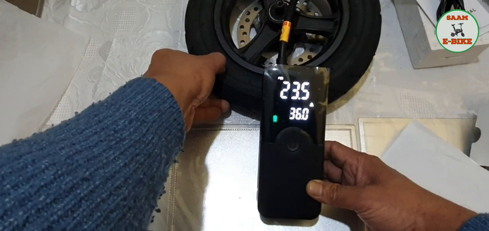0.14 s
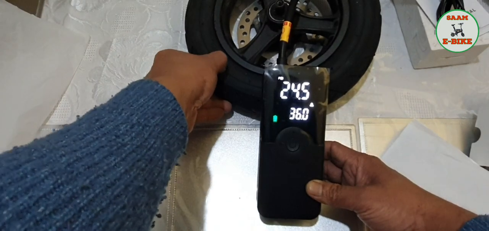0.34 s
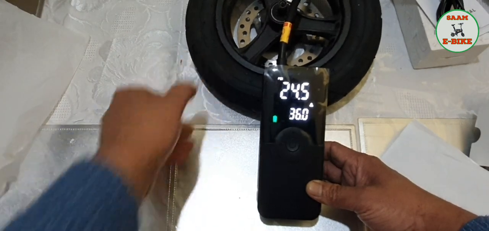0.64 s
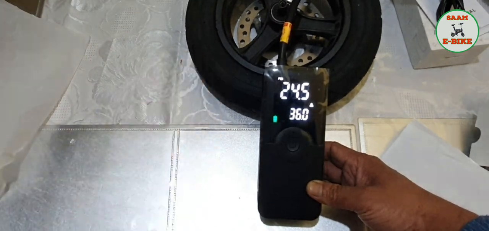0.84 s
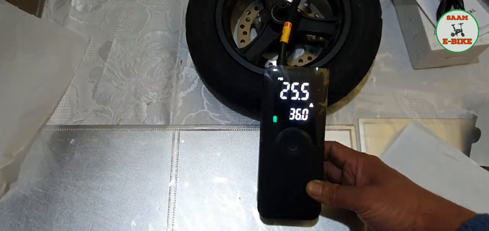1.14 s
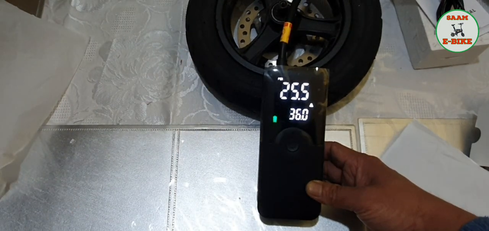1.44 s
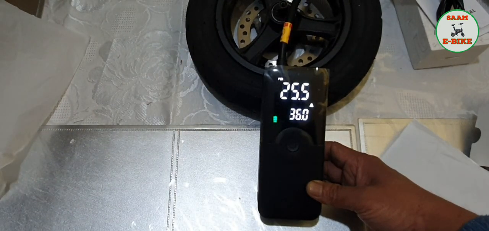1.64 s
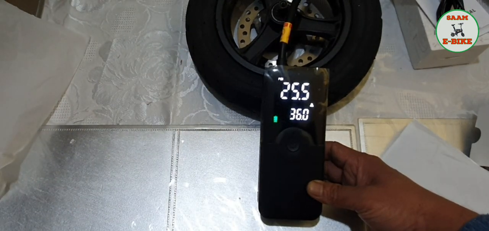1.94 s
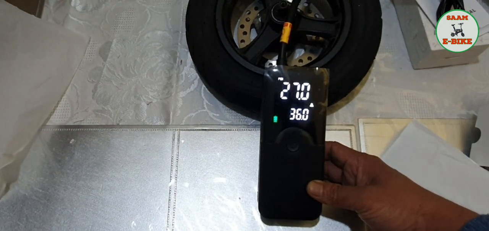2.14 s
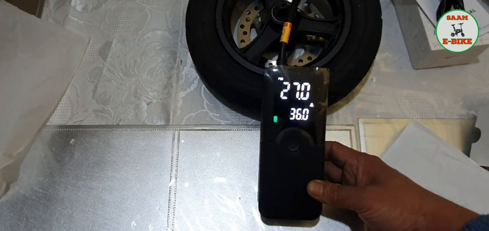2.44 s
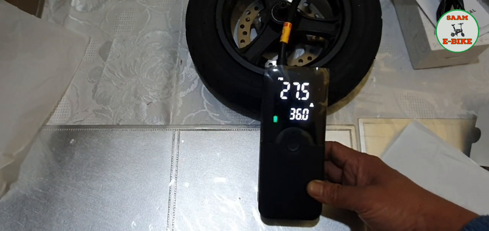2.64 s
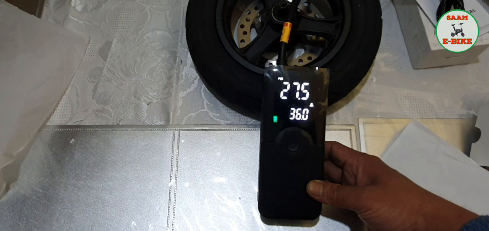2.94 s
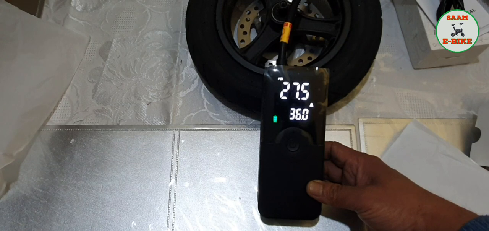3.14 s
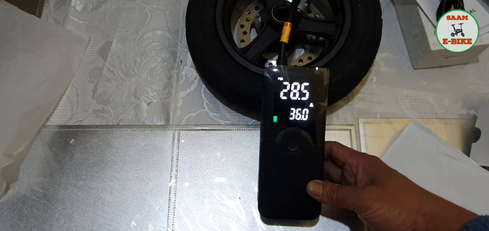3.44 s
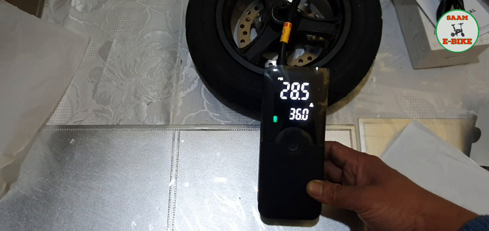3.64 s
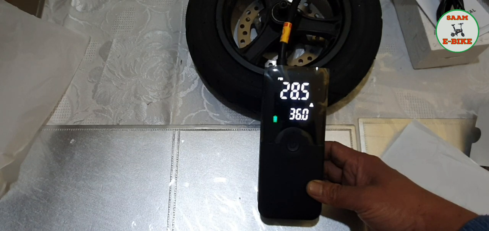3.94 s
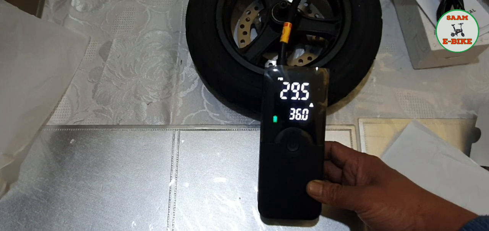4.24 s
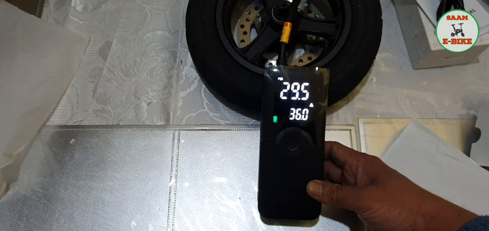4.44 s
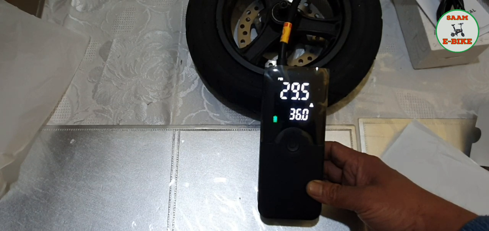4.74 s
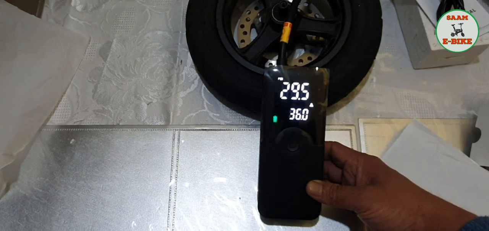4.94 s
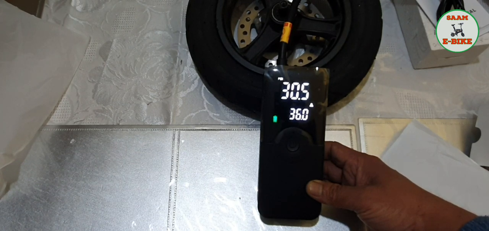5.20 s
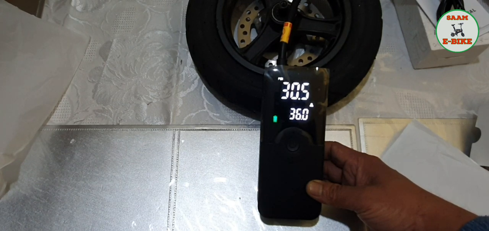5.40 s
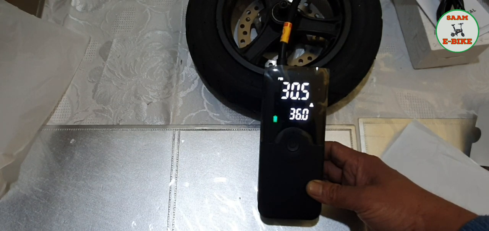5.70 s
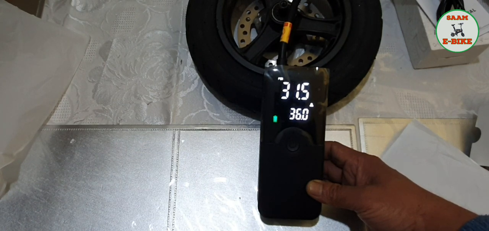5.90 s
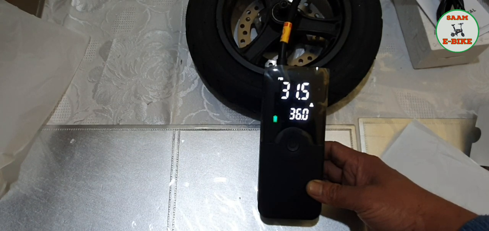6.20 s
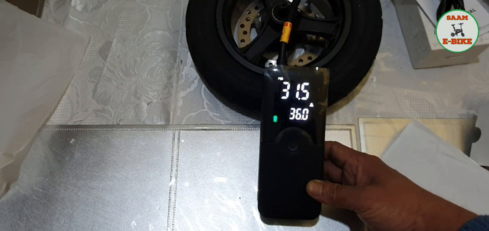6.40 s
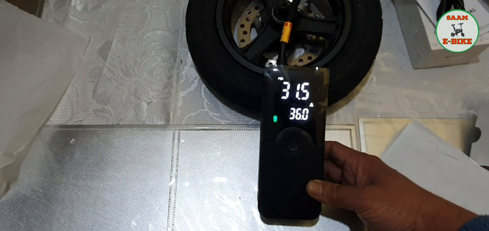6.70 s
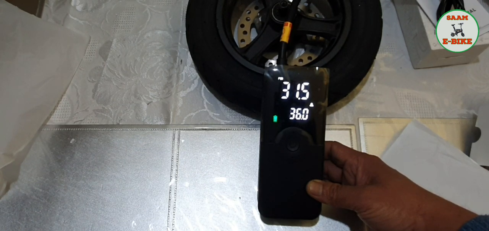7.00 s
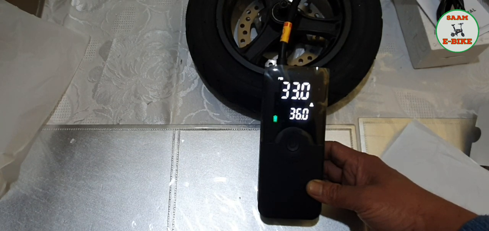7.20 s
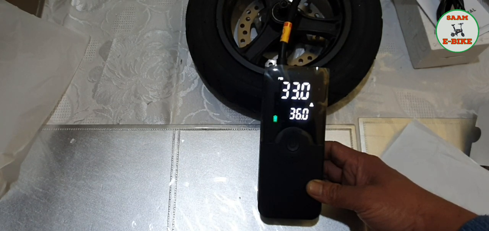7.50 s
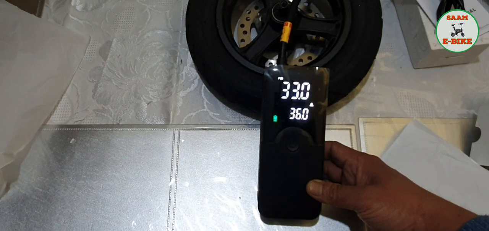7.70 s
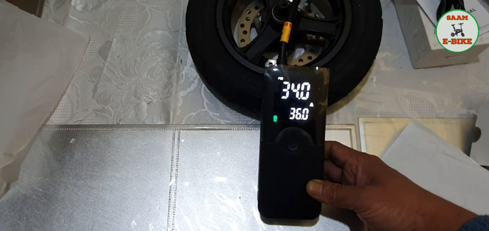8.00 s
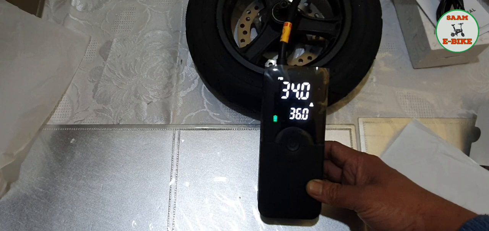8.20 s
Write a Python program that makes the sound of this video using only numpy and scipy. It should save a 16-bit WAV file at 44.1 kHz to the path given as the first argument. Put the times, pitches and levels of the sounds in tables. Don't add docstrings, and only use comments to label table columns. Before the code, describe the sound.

From 0 s a small battery piston compressor is already at full speed, close to the microphone over a tiled floor, and it never stops. About 54 strokes a second merge into a rough, low buzzing drone with strong midrange harmonics, dense metallic gear chatter around 1 to 3 kHz and a fluttering valve hiss above. Until about 0.5 s a hand presses nearby, adding a little low shake and slightly shading the treble; it lets go and withdraws by 1.5 s, so the timbre opens subtly. Between about 2 and 5 s the tire firms up: the pulse becomes harder and its harmonic color changes, while pitch sags gently toward 52 strokes a second, with tiny wavering. From 5 s to the end at 8.35 s the same dry, loud rattle holds steady, with short hard reflections and fairly wide treble, cutting off still running.

```python
import sys
import numpy as np
from scipy import signal
from scipy.fft import rfft, irfft, next_fast_len
from scipy.io import wavfile
from scipy.ndimage import map_coordinates

SR = 44100
rng = np.random.default_rng(int(sys.argv[2]) if len(sys.argv) > 2 else 0)


def int16_out(signal):
    q = np.round(np.clip(np.atleast_2d(signal).T, -1, 1) * 32767)
    wavfile.write(sys.argv[1], SR, q.astype(np.int16))


def volts(x):
    e = np.asarray(x, float) / 20
    return 10 ** e


N = 368232

# time_s, speed_hz [turns per second]
CRANK = [(0, 54.08), (.76, 54.09), (1.52, 53.8), (2.28, 53.51), (3.04, 53.36), (3.8, 52.82), (4.55, 52.72),
         (5.31, 52.33), (6.07, 52.8), (6.83, 52.64), (7.59, 52.26), (8.35, 52.31)]
# time_s, nearness [0-1], lean_db [left over right]
HAND = [
    (0, 0.87, 0),
    (.42, .9, -1),
    (.56, 0.67, -1),
    (.9, 0.33, 0),
    (1.2, 0.46, 0.2),
    (1.5, 0.23, 0.2),
    (4, 0.01, 0.06),
    (8.35, 0.21, -0.05),
]


def unit(x):
    return x / np.sqrt(np.mean(x ** 2) + 1e-20)


def along(points, hz):
    f, v = np.transpose(points)
    return np.interp(np.log(hz + 1), np.log(f + 1), v)


def curves(rows):
    time_s, *columns = np.transpose(rows)
    return [np.interp(np.arange(N) / SR, time_s, column) for column in columns]


def wobble(rate):
    knots = rng.standard_normal(int(N * rate / SR) + 4)
    return map_coordinates(knots, [np.arange(N) * rate / SR])


def s_curve(at_s, over_s):
    return 1 / (1 + np.exp((at_s - np.arange(N) / SR) / over_s))


def filtered(x, response):
    m = next_fast_len(N + SR // 4)
    return irfft(rfft(x, m) * response(np.fft.rfftfreq(m, 1 / SR)), m)[..., :N]


def bell(hz, centre_hz, width_hz):
    return 1 / (1 + (2 * (hz - centre_hz) / width_hz) ** 2)


def air_pulse(angle, hard, thump_db):
    # soft_tyre_db, hard_tyre_db, held_tyre_db
    air_orders = [(-17.5, -23, -20), (-16.5, -13, -14.5), (-14.5, -13, -11), (-11, -10.5, -10.5),
                  (-18, -6.5, -40), (-10, -11.5, -9), (-16, -6, -9.5), (-12, -12, -16.5),
                  (-13.5, -5.5, -8.5), (-39, -35, -5), (-24, -7, -26), (-4.5, -19, -18), (-11, -18, -46),
                  (-13, -19, -27), (-17, -11.5, -13), (-19, -11.5, -18), (-2.5, -17, -5.5), (0, -16, -5),
                  (-2.5, -7, -3), (0.5, -19, -17.5), (-35, -39, -13), (-12, -23, -28), (-22, -8, -11)]
    # centre_hz, width_hz, lift_db
    rim = [
        (800, 14, 9),
        (1011.5, 27.6, 7),
    ]
    # crank_multiple, level_db
    motor = [
        (12.68, -45.5),
        (13.62, -59),
    ]
    hand, speed_hz = curves(HAND)[0], curves(CRANK)[0]

    pressing = 1 - s_curve(at_s=0.53, over_s=.03)
    shake_db = -49.5 - 3 * hard + 12.5 * pressing
    x = volts(shake_db) * np.cos(2 * np.pi * angle - .7 + .08 * wobble(60))
    x += volts(thump_db + 0.4 * wobble(4.6)) * np.cos(4 * np.pi * angle + 0.036 * wobble(60))

    for k, (soft_db, hard_db, held_db) in enumerate(air_orders, 3):
        unsteady = .011 * k
        free_db = soft_db + (hard_db - soft_db) * hard
        db = -35.5 + free_db + (held_db - free_db) * hand + 4 * unsteady * wobble(4.18)
        db += sum(lift_db * bell(k * speed_hz, hz, width) for hz, width, lift_db in rim)
        thud = 2 * np.pi * k * (angle - .84) - 2.6
        thud += .36 * (-1) ** k + .045 * k * np.sin(k * k / 5)
        smear = 1.17 * hard * (k > 11) * np.sin(k * k)
        x += volts(db) * np.cos(thud + smear + unsteady * wobble(16))

    for k, db in motor:
        x += volts(db + 1.1 * wobble(3.5) - 4.7 * hand) * np.cos(2 * np.pi * k * angle)
    return np.sqrt(2) * x


def knocks(angle, hard):
    # pitch_hz, length_s, soft_tyre_db, hard_tyre_db, hand_change_db, scatter_turns
    bursts = [(2230, 0.0026, -43, -38, -1, 0.000453), (2760, 0.0011, -36, -44, -5, 0.00054),
              (2334, 0.0023, -23, -25, 1, 0.0004), (2187, 0.0018, -47, -29, -40, 0.00012),
              (5040, 0.0023, -33.5, -47, 1, 0.0014), (1979, 0.0018, -22, -24, -14.5, 0.00011),
              (1930, 0.002, -32, -22, 6, 0.00043), (1622, 0.0017, -34, -46, 2.5, 0.00054),
              (1443, 0.0022, -32.5, -25.5, -10.5, .0003), (3473, 0.0011, -40.5, -36, 6.5, 0.0014),
              (2765, 0.00091, -33.5, -32.5, -8, 0.00086)]
    knock_angles = [.07, .4, .58, .61, .67, .72, .74, .77, .74, .87, .88]
    x, t = np.zeros(N), np.arange(-SR // 100, SR // 100 + 1) / SR
    hand = curves(HAND)[0]
    stroke = rng.standard_normal((500, 2))
    for at, (hz, length, soft_db, hard_db, hand_db, scatter) in zip(knock_angles, bursts):
        chance = rng.standard_normal((500, 2))
        late = .0009 * stroke[:, 0] + scatter * chance[:, 0]
        spot = np.interp(np.arange(len(chance)) + at + late, angle, np.arange(N), right=N + 5)
        whole, part = spot.astype(int), spot % 1
        size = volts(.3 * stroke[:, 1] + .5 * chance[:, 1])
        blows = np.bincount(whole, size * (1 - part), N + 9)
        blows = blows + np.bincount(whole + 1, size * part, N + 9)
        falling = np.sin(2 * np.pi * hz * t * (1 - 4 * t))
        burst = np.exp(-.5 * (t / length) ** 2) * falling
        db = soft_db + (hard_db - soft_db) * hard + hand_db * hand
        x += volts(db) * unit(signal.fftconvolve(blows[:N], burst, "same"))
    return x


def load(angle, centre, sharp, skew):
    u = 2 * np.pi * (angle - centre)
    return np.exp(sharp * (np.cos(u + skew * np.cos(u) - skew) - 1))


def rattle(angle, hard, db):
    # frequency_hz, density_db [per Hz]
    colour = [(40, -30), (150, -23), (330, -19), (520, -15.5), (800, -7.5), (1100, -5), (1600, -3.5),
              (2000, -3.5), (2400, -2), (3300, -5.5), (5000, -12.5), (6400, -9.5), (7500, -19),
              (12000, -61)]
    pinion = np.cos(2 * np.pi * angle / 5)
    ticks = np.cos(2 * np.pi * (9 * angle - .85))
    teeth = volts(2.2 * ticks + .8 * pinion + 0.63 * wobble(900))
    stroke = load(angle, .73, sharp=1.7, skew=.2)
    clatter = casing_noise(stroke * teeth, colour, lift_db=6)
    bright = filtered(clatter, lambda hz: 1 / (1 + (2900 / (hz + 1)) ** 8))
    chatter = casing_noise(volts(0.22 * wobble(700)), colour, lift_db=6)
    loose = filtered(chatter, lambda hz: 1 / (1 + (hz / 1350) ** 8))
    return volts(db + 3.5) * (chatter - 0.14 * hard * loose) + volts(db + 3.0) * bright


def hiss(angle, db):
    # frequency_hz, density_db [per Hz]
    colour = [(3000, -26), (5500, 0), (6800, -7.5), (8900, -4.5), (10000, -3), (11400, -5.5), (12400, -0.5),
              (13800, -4.5), (15000, -6), (15800, -7.5)]
    flutter = np.cos(2 * np.pi * (7 * angle + 0.29))
    bursts = volts(.7 * flutter + 0.18 * wobble(30) + 0.64 * wobble(1200))
    gate = (0.5 + load(angle, 0.55, sharp=1.34, skew=0.55)) * bursts
    air = casing_noise(gate, colour, lift_db=3)
    shaded = filtered(air, lambda hz: 1 / (1 + ((hz - 9900) / 1100) ** 4))
    return volts(db + 2.3) * (air - 0.29 * curves(HAND)[0] * shaded)


def casing_noise(gate, spectrum, lift_db):
    hissing = gate * rng.standard_normal((2, N))
    return unit(filtered(hissing, lambda hz: volts(along(spectrum, hz)) * shell(hz, lift_db)))


def shell(hz, lift_db):
    # centre_hz, width_hz, level_db [unused]
    modes = [(2317, 110, 0), (2160, 1450, 0), (2800, 270, 0), (3626, 300, -3), (3960, 105, -6),
             (4350, 27, -7), (4555, 310, -6), (5250, 110, -5), (5670, 230, -7), (7700, 210, -12),
             (8500, 310, -11), (9560, 210, -10), (10350, 230, -11), (11100, 180, -13), (12350, 200, -9),
             (13500, 200, -10), (14130, 150, -12)]
    # centre_hz, width_hz, depth_db
    notches = [(2520, 82, 1.5), (3310, 90, 5), (4270, 48, -4.5), (4440, 80, 6.5), (5430, 190, 7.5),
               (6090, 130, 5.5), (6680, 170, 8.5), (8260, 130, -0.5), (8800, 200, 2), (10250, 83, 1),
               (11800, 200, 0.5), (12820, 120, 0), (13800, 150, 3)]
    lift = np.max([bell(hz, c, w) for c, w, _ in modes], axis=0)
    cut_db = sum(db * bell(hz, c, w) for c, w, db in notches)
    return volts(lift_db * lift - cut_db)


def echoes(hz, column):
    # delay_s, mid_gain, side_gain
    walls = [(.0006, 0.4, -0.28), (.0014, -0.5, 0.17), (.0027, 0.32, 0.94), (.0043, 0.4, -0.019),
             (.0071, 0.4, 0.6), (0.015, 0.1, 0.1)]
    rows = np.array(walls)
    gains = rows[:, column]
    return np.exp(-2j * np.pi * np.outer(hz, rows[:, 0])) @ gains / np.linalg.norm(gains)


def scene():
    # frequency_hz, side_over_mid_db
    width = [(60, -29), (110, -17), (200, -13), (380, -27), (700, -4), (1290, -5), (2380, -7), (4400, 0),
             (8120, -3.5), (15000, 1)]
    hard = 0.9 * s_curve(at_s=3.66, over_s=0.89)
    angle = np.cumsum(curves(CRANK)[0]) / SR + .143
    angle = angle + .006 * wobble(5) + .003 * wobble(13)
    noise, scattered = rattle(angle, hard, db=-26.5) + hiss(angle, db=-30)
    source = noise + air_pulse(angle, hard, thump_db=-35.5) + knocks(angle, hard)
    mid = filtered(source, lambda hz: 1 + 0.28 * echoes(hz, 1) * hz / (hz + 4000))
    side = filtered(source, lambda hz: .8 * echoes(hz, 2)) + .88 * scattered
    side = filtered(side, lambda hz: volts(along(width, hz)))
    return np.array([mid + side, mid - side]) * volts(np.outer([.5, -.5], curves(HAND)[1]))


def roll_off(x):
    return signal.sosfilt(signal.butter(12, 16470, fs=SR, output="sos"), x)


def record(dry):
    # frequency_hz, left_over_right_db
    lean = [(60, 2.5), (110, 1), (200, 2.5), (380, 1.5), (700, -1.5), (1290, -1.5), (2380, 1.5),
            (4400, -0.5), (8120, 3), (15000, 6)]
    top_hz = 15830
    mix = filtered(dry, lambda hz: volts(np.outer([.5, -.5], along(lean, hz))) * (hz < top_hz))
    return roll_off(mix)


dry = scene()
out = record(dry)
int16_out(out)
```